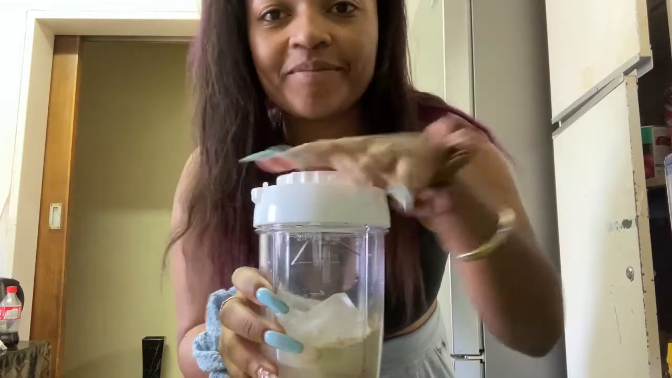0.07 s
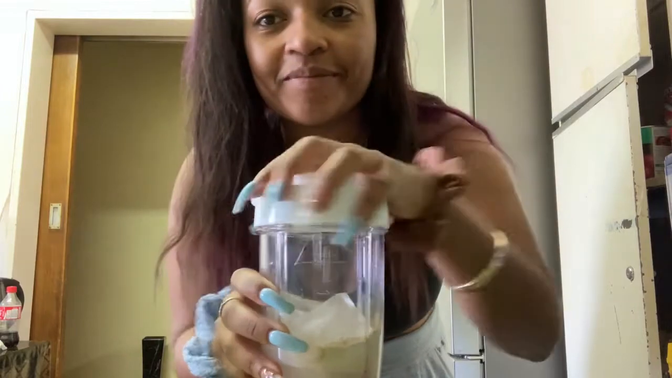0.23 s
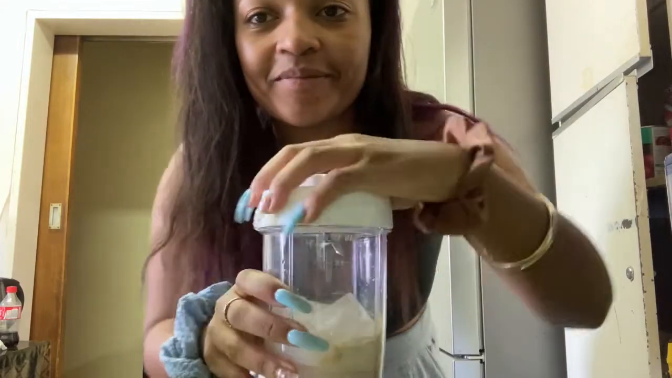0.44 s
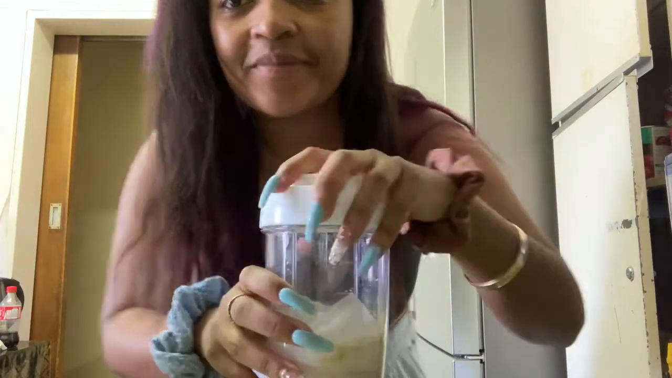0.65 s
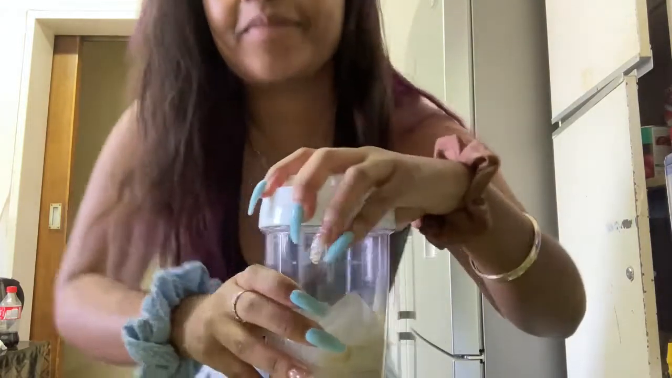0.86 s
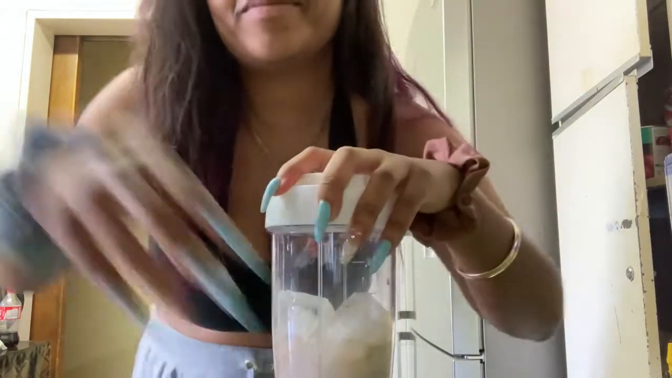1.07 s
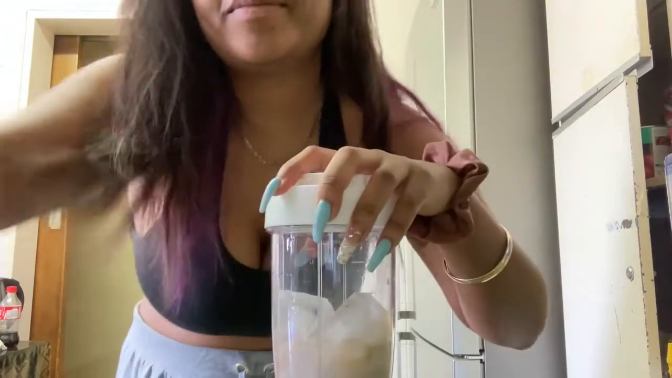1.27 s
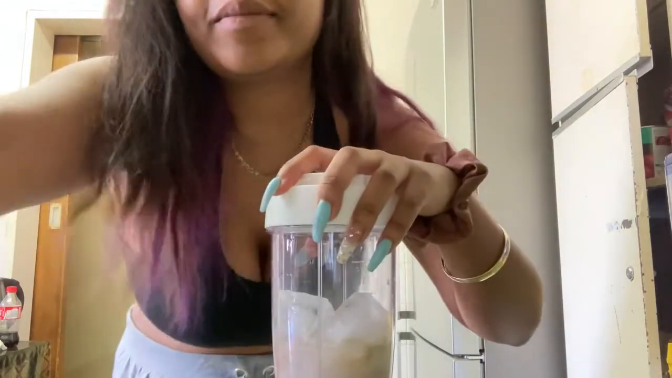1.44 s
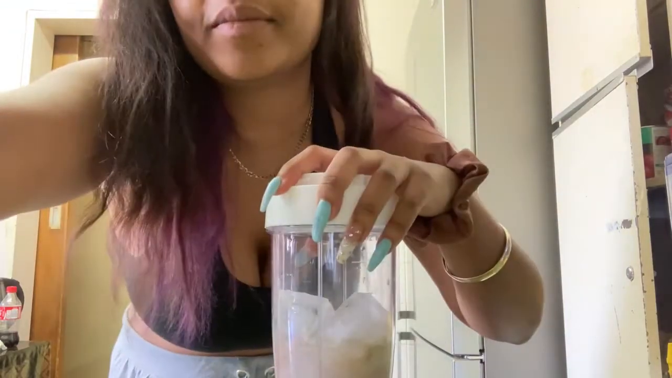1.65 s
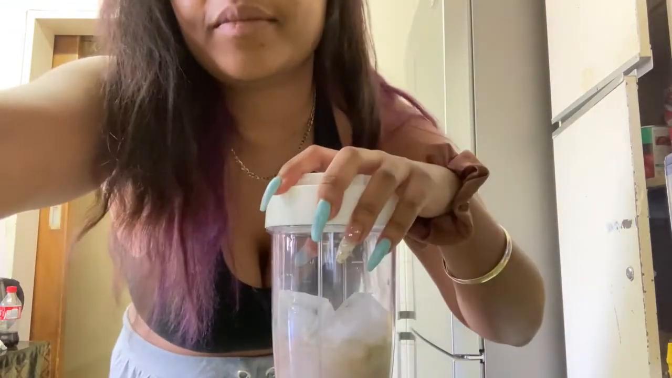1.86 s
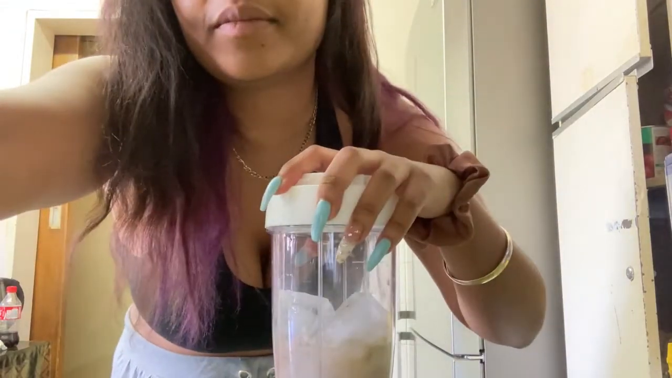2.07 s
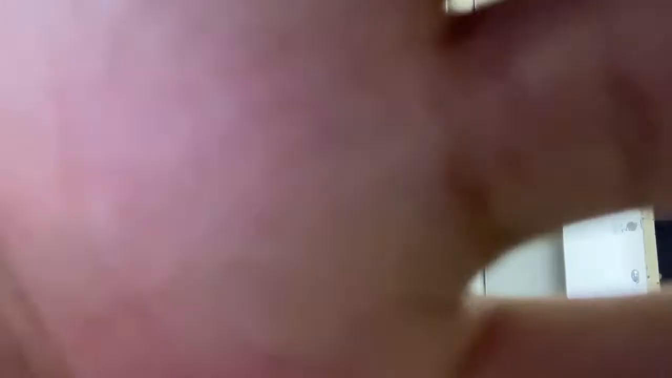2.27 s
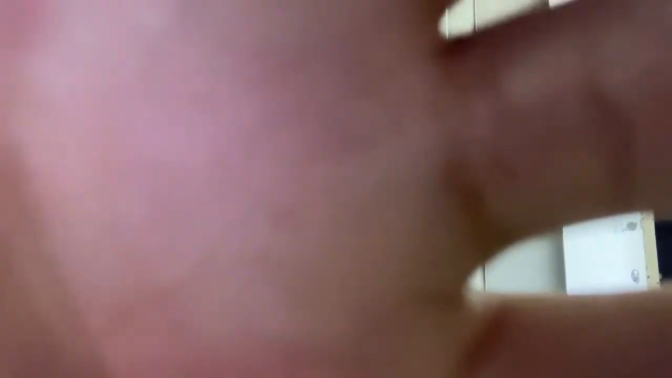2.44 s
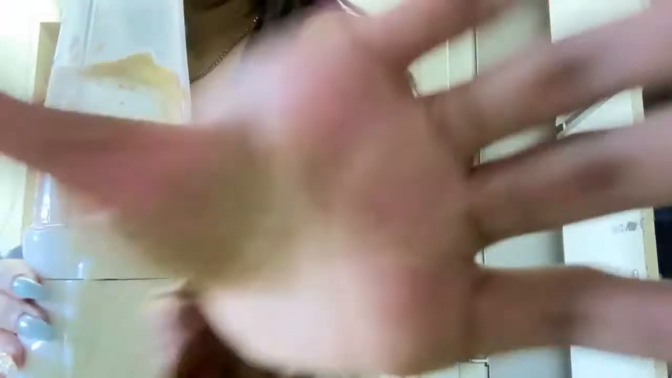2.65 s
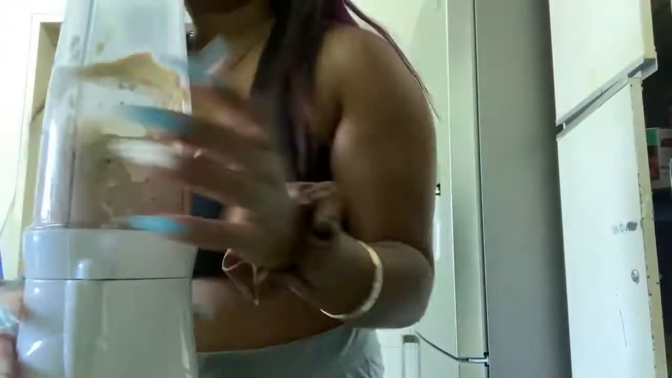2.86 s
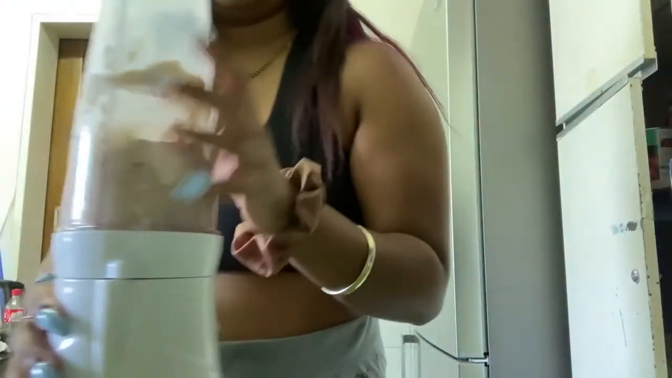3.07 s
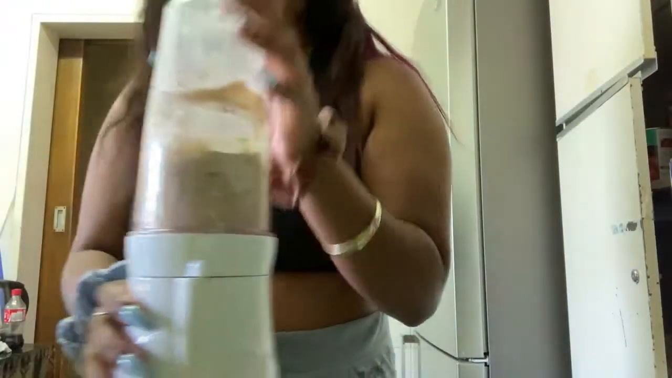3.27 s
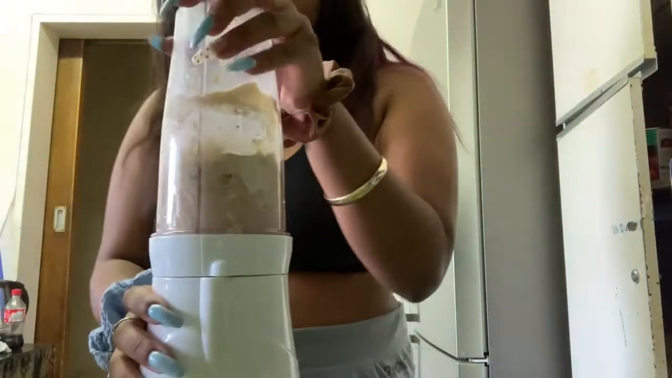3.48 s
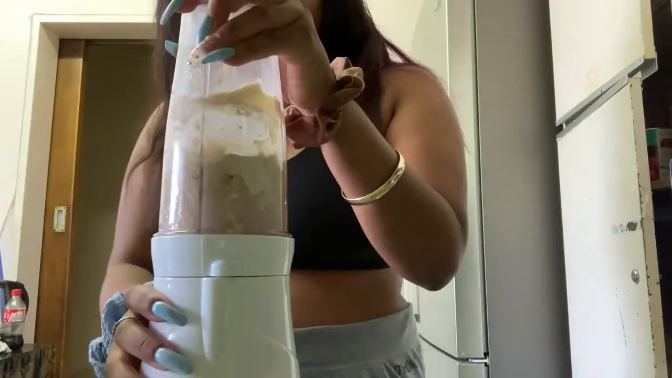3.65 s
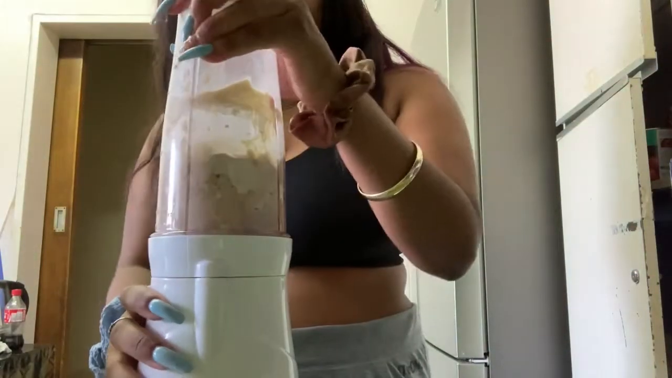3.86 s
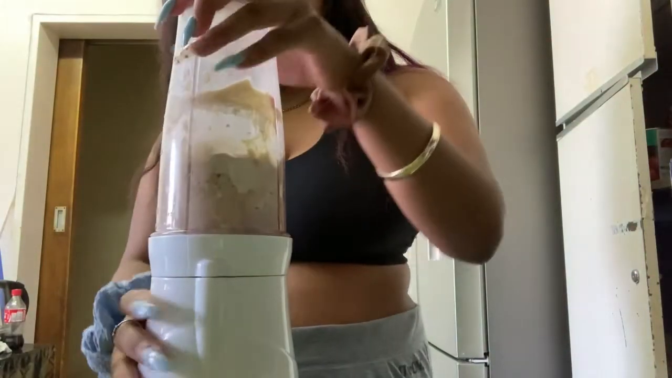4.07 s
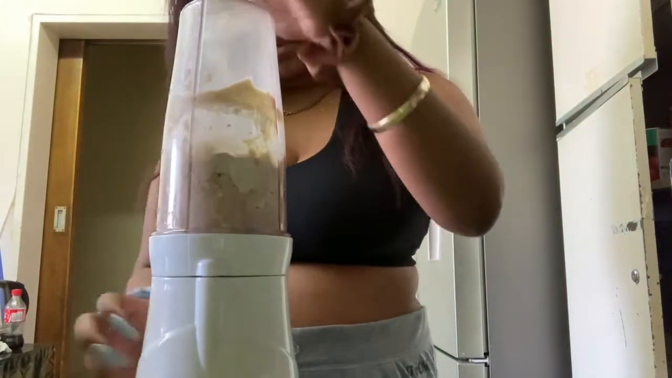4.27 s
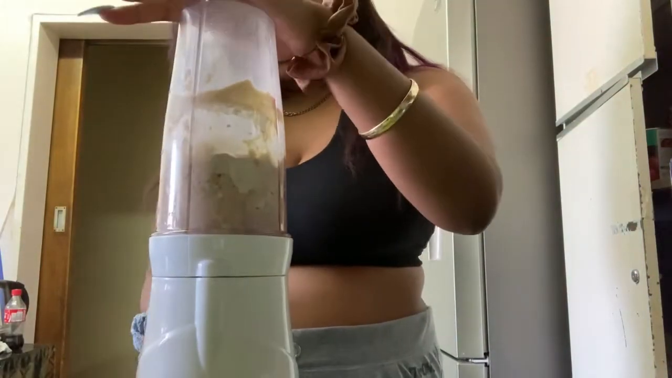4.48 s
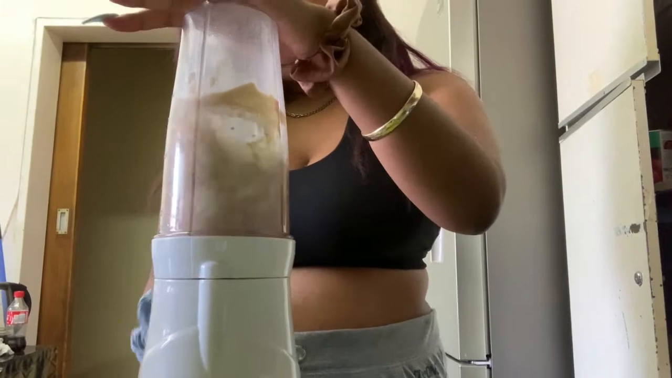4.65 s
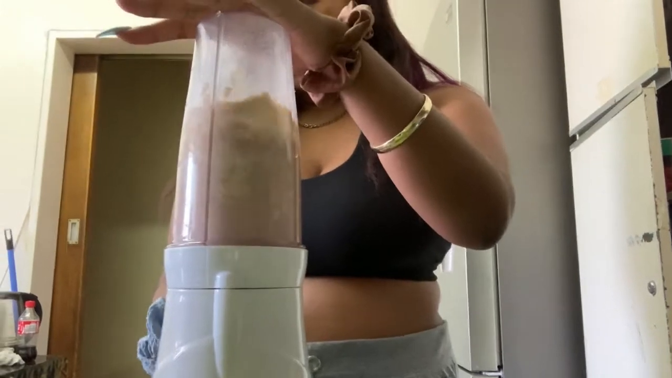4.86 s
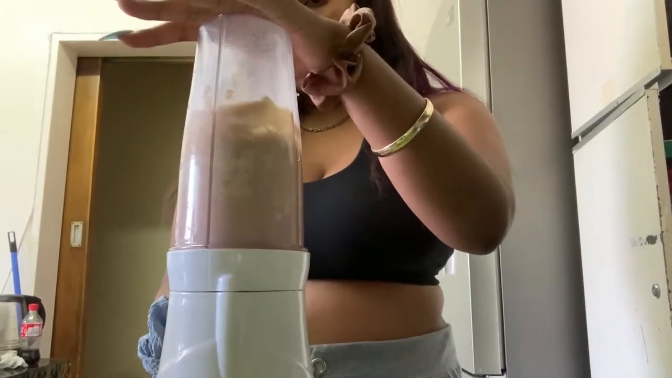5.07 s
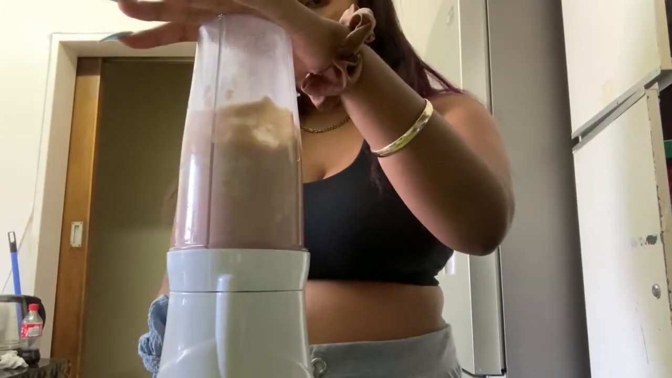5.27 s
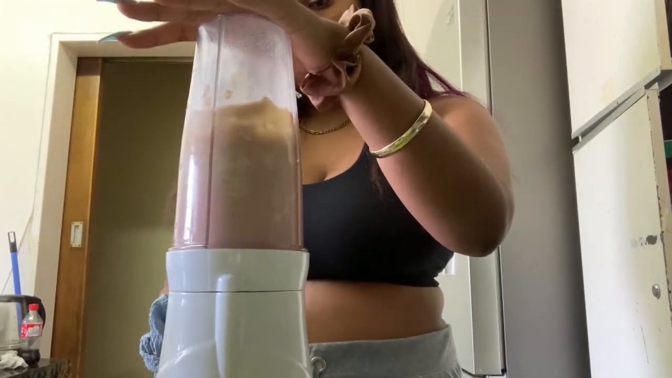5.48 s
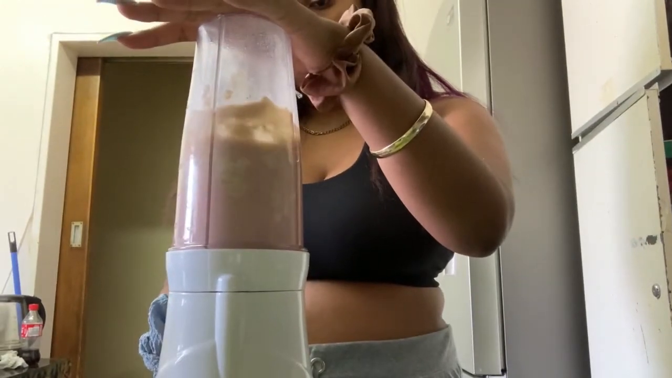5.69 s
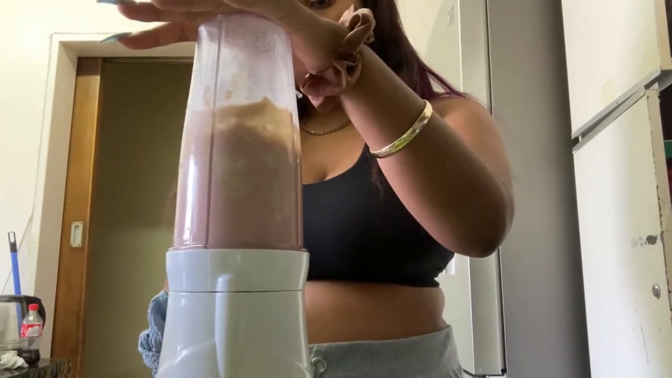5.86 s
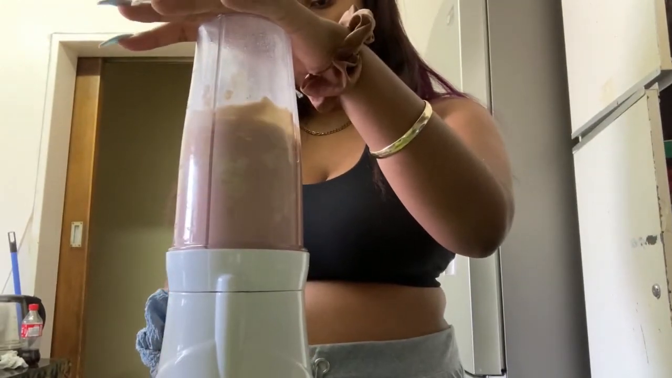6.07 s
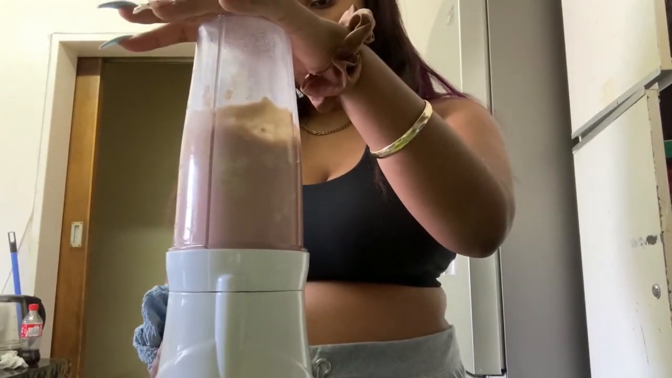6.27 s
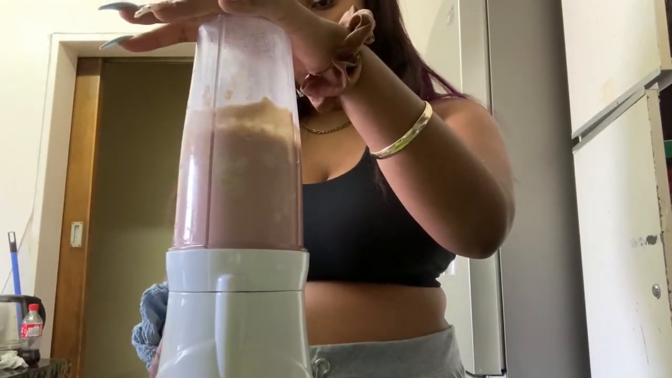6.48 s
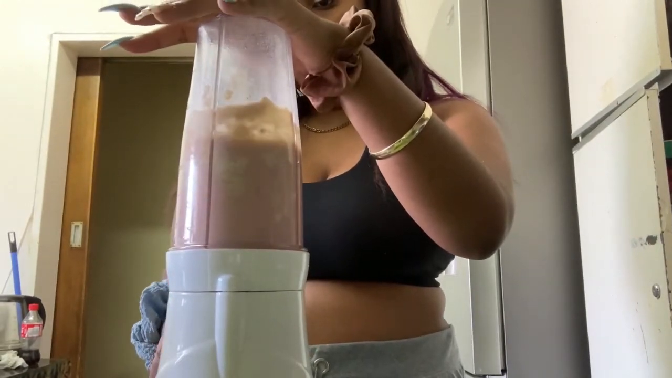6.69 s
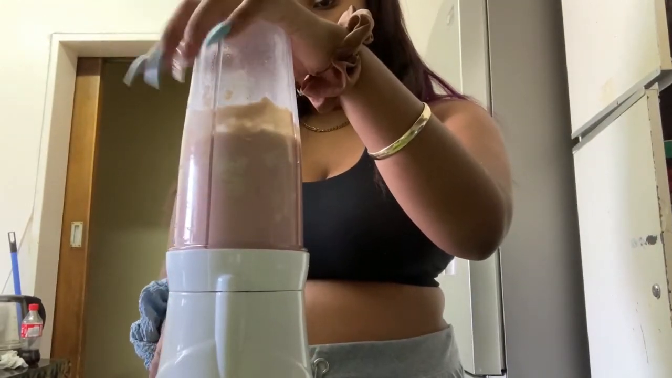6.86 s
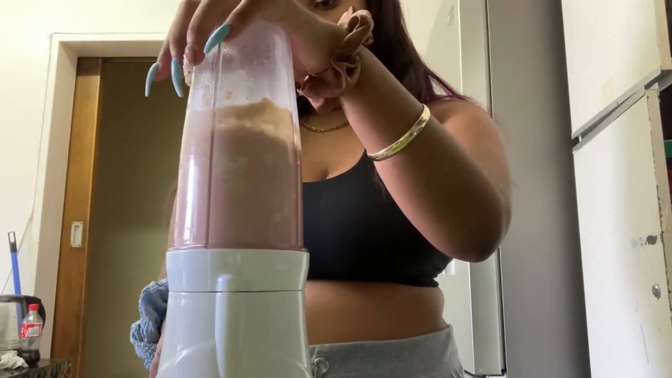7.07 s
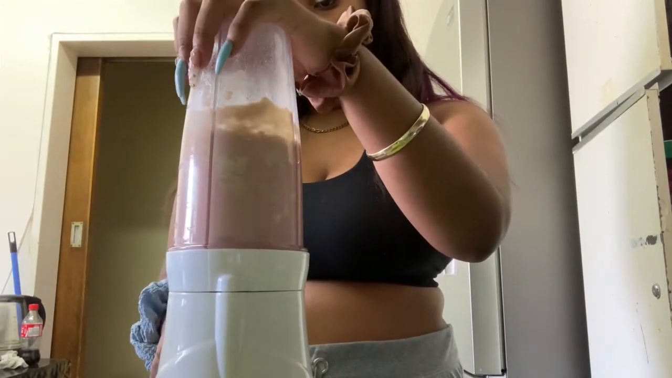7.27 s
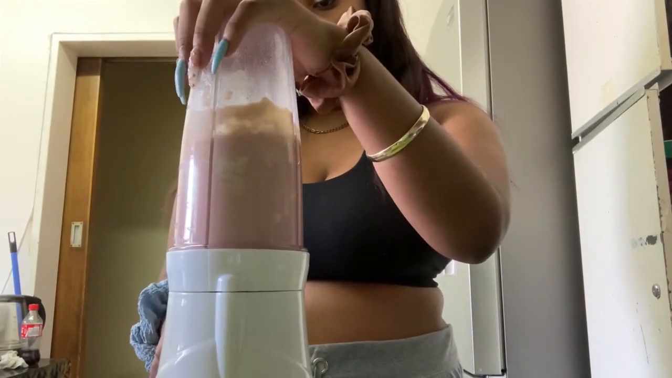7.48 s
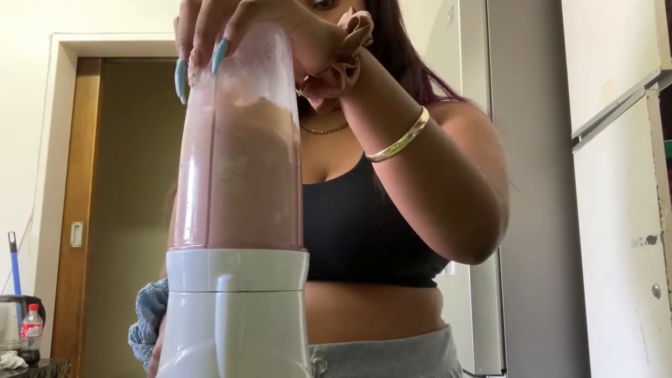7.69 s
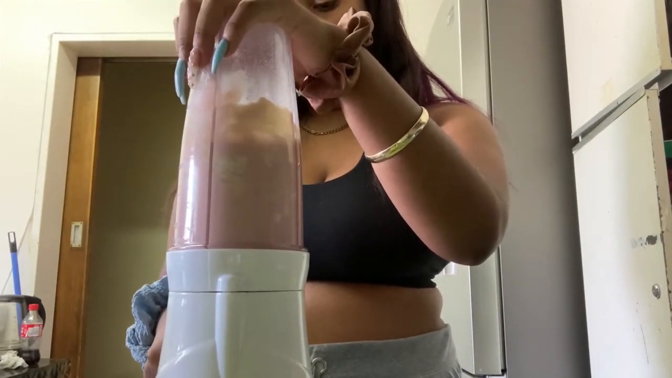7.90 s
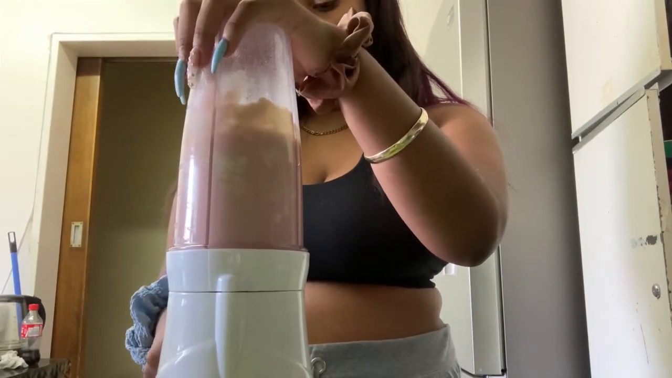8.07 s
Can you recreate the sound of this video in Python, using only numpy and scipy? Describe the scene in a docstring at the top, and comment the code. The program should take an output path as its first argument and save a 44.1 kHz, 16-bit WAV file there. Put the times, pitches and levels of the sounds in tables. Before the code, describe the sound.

Quiet handling first: rustling hands, plastic taps and low thumps on a counter, then near-stillness over fridge hum. A hollow sliding hiss and several firmer clicks follow, the strongest just before four seconds. Past the middle a switch clicks and a small blender starts at once, loud and rough, its ice cracking hardest at first, then rattling and churning over an unsteady motor drone. Recorded close, with slight kitchen reverberation.

```python
"""A kitchen counter, heard close by at two microphone ports, with room air and a fridge's hum throughout.
First hands rub and set down a personal blender: plastic clicks, counter thumps, a seal's squeak, soft bumps,
a very brief near-silence, a palm's hiss, a nail's tick and a juddering drag.
Then its switch clicks on: blades crack ice and grind chips against the plastic jar, air pockets ring in the
slush, liquid churns, and the load sags the motor, whose unbalanced shaft drones through the counter."""
import sys
import numpy as np
from scipy import signal
from scipy.fft import rfft, irfft, next_fast_len
from scipy.io import wavfile
from scipy.ndimage import uniform_filter1d

SR = 44100
rng = np.random.default_rng(int(sys.argv[2]) if len(sys.argv) > 2 else 0)


def wrap_up_sound(samples):
    """Save the sound to the file named by the first command line argument, as 16-bit audio."""
    columns = np.atleast_2d(samples).T
    # keep every value between -1 and 1, then stretch to whole-number steps
    tamed = np.clip(columns, -1, 1)
    steps = np.round(tamed * 32767).astype(np.int16)
    wavfile.write(sys.argv[1], SR, steps)


N = 358533
T = np.arange(N) / SR
START_S = 4.645  # the motor starts
# the shaft's speed at switch-on, the free speed it heads for, and its lag
KICK_HZ, FREE_HZ, INERTIA_S = 99.15, 219.1, 0.25
MILLING_DB = -25.5  # the blades keep milling loose chips between bites
AIR_DB = -52  # room air
# bites, when ice is drawn into the blades and brakes them: (start t/s, length/s, grinding level/dB, drag f/Hz)
BITES = [(4.646, 0.25, -20.5, 94), (5.123, 0.096, -26, 58.4), (5.302, .14, -21, 61.5),
         (5.675, 0.039, -20, 144), (5.926, 0.053, -21, 74), (6.096, 0.092, -20, 82.5),
         (6.249, 0.15, -36, 28), (6.681, 0.21, -22.5, 80.6), (6.997, 0.078, -23, 11.8),
         (7.134, 0.032, -21.5, 131), (7.356, 0.076, -49, 188), (7.496, 0.054, -20, 70),
         (7.694, 0.025, -49, 48.3), (7.803, 0.085, -21.5, 137), (7.982, 0.045, -19.5, 8.4)]


def ice(turns, chips_per_s=1700, spread_db=2.5, chips_db=-4.0, slush_db=-15, cracks_db=16.0,
        patchy_db=1.4, flicker_db=1.0, count=7):
    """Chips and cubes strike several spots on the jar, over the hiss of the slush; the switch clicks first."""
    # the switch's click (first row), then the loudest cubes hit by a blade:
    # (t/s, level/dB before cracks_db, treble as hardness/dB, decay of the click or crumbling/s)
    hits = [(4.6433, -13.5, -0.5, 0.0071), (4.657, -5, -11.5, 0.0086), (4.677, -11, -4.5, 0.0053),
            (4.699, -6.5, -13, 0.011), (4.738, -7.5, -11, 0.0047), (4.759, -6, -14, 0.003),
            (4.819, -9, -15.5, 0.004), (4.845, -11.5, -9, 0.01), (4.864, -17, -2.5, 0.019),
            (4.9, -21, 0, 0.012), (5.02, -15, -31, 0.013), (5.054, -16, -29, .006),
            (5.129, -14, -30, 0.0078), (5.21, -14, -15.5, 0.013), (5.262, -14, -17, .018),
            (5.314, -11, -14, 0.017), (5.331, -9.5, -12, 0.0049), (5.369, -21.5, 2, 0.0029),
            (5.402, -16, -5, 0.029), (5.53, -14, -29, 0.012), (5.695, -13, -13, 0.014),
            (5.931, -15.5, -16, 0.0084), (5.96, -14.5, -22, 0.0099), (5.996, -14.5, -26, .005),
            (6.0797, -20.5, -7, 0.0038), (6.15, -17.5, -3.5, 0.02), (6.254, -11.5, -30, .005),
            (6.316, -16, -25, .008), (6.342, -11.5, -18, 0.0096), (6.469, -12, -23, 0.0038),
            (6.696, -20, -26, .006), (6.73, -13.5, -28, .01), (6.775, -15.5, -13, 0.01),
            (6.817, -14, -14, 0.0042), (6.842, -14.5, -10.5, 0.0077), (7.06, -15.5, -22, 0.013),
            (7.147, -11.5, -31, 0.011), (7.158, -12, -27, 0.0036), (7.223, -15.5, -33, .012),
            (7.332, -13.5, -18, 0.0048), (7.364, -12.5, -29, 0.0068), (7.375, -12.5, -31, 0.0062),
            (7.447, -19.5, -22, .005), (7.524, -10, -17, .014), (7.541, -12, -13, 0.0054),
            (7.606, -17.5, -15, 0.0048), (7.633, -16, -11.5, 0.013), (7.699, -11, -18, 0.014),
            (7.795, -20.5, -26, 0.0039), (7.8182, -14.5, -7, .003), (7.841, -9.5, -30, 0.015),
            (7.922, -19, -9.5, 0.0032), (7.986, -11.5, -35, 0.0089), (8.112, -13, -29, 0.015)]
    milling_treble_db, bite_treble_db = -7, -11
    bite = biting()
    grinding = np.hypot(bite, gain_of(MILLING_DB))
    level = grinding * gain_of(patchy_db * wander(42)) * spin_up(0.03)
    treble_db = milling_treble_db + (bite_treble_db - milling_treble_db) * bite / grinding
    hard = gain_of(treble_db + flicker_db * wander(36))
    sizes = gain_of(spread_db * np.minimum(rng.exponential(1, N), 4.5)) * rng.choice([-1, 1], N)
    # chips fly in bunches, once in each turn of the blades
    bunching = 1 + 0.6 * np.cos(2 * np.pi * turns)
    chips = evened(sizes * (rng.random(N) < bunching * chips_per_s / SR))
    blows = level * (gain_of(chips_db) * chips + gain_of(slush_db) * rng.standard_normal(N))
    spot = rng.integers(0, count, N)
    out = np.zeros((2, N))
    all_hits = hits + pieces()
    on = int(START_S * SR) - 1024
    for k in range(count):
        # the swirl throws the ice now at one spot, now at another
        drive = blows * (spot == k) * evened(gain_of(1.3 * wander(15)))
        drive = drive + (hard - 1) * treble(drive)
        for at, *hit in all_hits[k::count]:
            add(drive, at, gain_of(cracks_db) * crack(*hit))
        out[:, on:] += convolve(space(drive[on:], room_db=-7.0), jar())
    return out * gain_of([[-0.6], [0.6]])


def crack(db, hard_db, decay_s, usual_treble_db=-13, heavy_db=-9, heft_db=3, heft_hz=800):
    """A cube breaks or the switch clicks: hard ones snap brightly, heavy ones also shove the wall of the jar."""
    spray = burst(decay_s, rise_s=0.00062)
    snap = (gain_of(hard_db - usual_treble_db) - 1) * treble(spray)
    low_pass = signal.butter(1, heft_hz, fs=SR, output="sos")
    shove = signal.sosfilt(low_pass, spray) * gain_of(heft_db + db - heavy_db)
    return gain_of(db) * (spray + snap + shove)


def pieces(per_s=16, level_db=-22, treble_db=-20, spread_db=1.5, decay_s=0.006):
    """Small pieces crack at random moments after switch-on: (t/s, level/dB, treble/dB, decay/s)."""
    times = T[(rng.random(N) < per_s / SR) & (T > START_S)]
    scatter = rng.standard_normal((len(times), 2))
    return [(s, level_db + spread_db * a, treble_db + spread_db * b, decay_s)
            for s, (a, b) in zip(times, scatter)]


def jar(shift=0.012):
    """Response of the jar towards each port; every spot struck rings a little higher or lower."""
    # modes of the filled jar: (f/Hz, width/Hz, lift at the left port/dB, lift at the right port/dB)
    jar_modes = [(500.7, 129, 7.5, 17.5), (731.4, 74, 13.5, 6), (1127, 85, 5, 7), (1488, 73, 1.5, 9),
                 (2244, 41, 5, 1.5), (2282, 43, 3, 6.5), (2485, 48, 2, 9.5), (2634, 67, 6, 1.5),
                 (2960, 34, 1, 2), (3654, 220, 8, 9), (3784, 104, 7, 5.5), (4747, 81, 7, 11),
                 (4325, 70, 10.5, 5)]
    # spectrum of ice striking the jar: (f/Hz, level/dB)
    ice_spectrum = [(40, -39), (150, -10), (280, -2.5), (600, -11.5), (850, 1.5), (1400, 0.5), (2500, 0.5),
                    (3300, -3), (4200, -10.5), (5400, -10), (9000, -8.5), (12000, -11.5), (15200, -11),
                    (16200, -44)]
    tuning = 1 + shift * rng.standard_normal(len(jar_modes))

    def towards(port):
        modes = [(hz * k, width, lift[port]) for (hz, width, *lift), k in zip(jar_modes, tuning)]
        return causal(lambda f: read(ice_spectrum, f) + lifts(modes, f))
    return np.array([towards(0), towards(1)])


def biting(attack_s=0.0089, release_s=0.0042):
    """Strength of the grinding in the bites: attack, hold, release."""
    total = np.zeros(N)
    for s, length, db, _ in BITES:
        attack = np.clip((T - s) / attack_s, 0, 1)
        release = np.exp(-np.maximum(T - s - length, 0) / release_s)
        total += gain_of(db) * attack * release
    return total


def pockets(width_hz=55, swing=0.06, patchy_db=4):
    """Air pockets in the whirling slush ring with the grinding; their pitch shifts as they open and close."""
    # air pockets: (f/Hz, level between bites/dB)
    pocket_rings = [(980, -43), (1300, -46.5), (2250, -44.5)]
    grinding = np.hypot(biting() / gain_of(MILLING_DB), 1) ** 0.5 * spin_up(0.02)
    rings = np.zeros(N)
    for hz, db in pocket_rings:
        pitch_hz = hz * (1 + swing * wander(7))
        ring = evened(resonate(rng.standard_normal(N), pitch_hz, width_hz))
        rings += gain_of(db + patchy_db * wander(12)) * ring
    return space(grinding * rings, room_db=-7)


def drone(turns, waver_db=1.5):
    """The unbalanced shaft drones at multiples of its turns, louder with speed and at the switch-on jolt."""
    level_db, db_per_octave, jolt_db, jolt_s = -23.5, 13.5, 31, 0.14
    order_levels_db = [2.5, -26.0, -17.0, -16, -21.5, -14.5]
    orders = sum(gain_of(db) * np.sin(2 * np.pi * (k + 1) * turns) for k, db in enumerate(order_levels_db))
    shake = 1 + 0.42 * wander(45)
    jolt = jolt_db * np.exp(-np.maximum(T - START_S, 0) / jolt_s)
    speed_db = db_per_octave * np.log2(shaft_speed() / FREE_HZ)
    hum = evened(orders) * shake * gain_of(level_db + speed_db + jolt + waver_db * wander(11.0))
    return space(spin_up(0.052) * hum, room_db=-26, scatter_db=-12) * gain_of([[0.3], [-0.3]])


def shaft_turns(unsteady=0.015):
    """Turns made by the shaft; the blows of the ice make its speed unsteady."""
    return np.cumsum(shaft_speed() * (1 + unsteady * wander(30))) / SR


def shaft_speed():
    """Each bite drags the shaft down; inertia smooths the sag and the recovery."""
    # the blades catch air and the motor races: (start t/s, length/s, push on the speed f/Hz)
    race = (6.47, .14, 30)
    drag_hz = sum(hz * ((T >= s) & (T < s + length)) for s, length, _, hz in BITES)
    race_s, race_length, race_hz = race
    drag_hz = drag_hz - race_hz * ((T >= race_s) & (T < race_s + race_length))
    pull = (FREE_HZ - KICK_HZ - drag_hz) * (T >= START_S)
    keep = np.exp(-1 / (SR * INERTIA_S))
    return KICK_HZ + signal.lfilter([1 - keep], [1, -keep], pull)


def churning(swirl_db=-30.5, lumpy_db=2.5):
    """The liquid rumbles through the counter, steadily and in gulps, stronger at the left port."""
    # spectrum of the churning liquid through the counter: (f/Hz, level/dB)
    churn_spectrum = [(20, -28), (45, -23), (80, -9.5), (100, 1), (113, -1), (150, 3.5), (200, -4),
                      (250, -20.5), (400, -16), (1000, -77)]
    # gulps, when the liquid slumps onto the blades: (middle t/s, length/s, level/dB)
    gulps = [(4.73, 0.6, -21), (5.42, 0.26, -22.5), (6.61, 0.17, -28), (7.42, 0.074, -25),
             (7.55, 0.058, -19.5), (7.71, 0.15, -24.5), (8.05, 0.19, -22.5)]
    churn = convolve(rng.standard_normal(N), causal(lambda f: read(churn_spectrum, f)))[0]
    churn = churn * np.hypot(gain_of(swirl_db + lumpy_db * wander(8.7)), swells(gulps))
    return space(spin_up(0.052) * churn, room_db=-16, scatter_db=-10) * gain_of([[2], [-2]])


def spin_up(rise_s):
    """Straight rise from silence at switch-on."""
    return np.clip((T - START_S) / rise_s, 0, 1)


def clicks(clicks_db=23, room_db=-4.0, usual_body_db=-5, usual_treble_db=-10, size=16384):
    """Plastic meets plastic: soft heavy contacts have more body, hard light ones more treble."""
    # clicks and knocks of lid, jar and base: (t/s, level/dB before clicks_db, body/dB, treble/dB,
    # ring of the struck spot f/Hz, its lift/dB, decay of the chatter/s)
    contacts = [(0.029, -29, 8, -33, 990, 9, 0.0029), (0.178, -37.5, 2, -11, 1100, 7, 0.0087),
                (0.194, -41, 8, -16, 238, 17, 0.0053), (0.2426, -27.5, -14, 0, 2750, 3.5, 0.0073),
                (0.246, -35, 13, -23, 300, 6, 0.0073), (0.633, -40, 2, -23, 1330, 7, 0.0078),
                (0.689, -38.5, -3, -15, 1310, 13, 0.0039), (1.6205, -37.5, -17, -19, 4240, 10, 0.003),
                (2.789, -44.5, -7, -11, 1700, 7, 0.012), (2.8177, -28, -19.5, -7, 1570, 14.5, 0.0075),
                (2.8894, -31.5, -12, -28, 1210, 11, 0.0083), (2.9044, -31.5, -6, -34, 1180, 9, 0.004),
                (3.486, -33.5, -7, -7.5, 1300, 6, 0.011), (3.5442, -34.5, -2.5, -5.5, 1500, 12.5, 0.006),
                (3.7358, -24.5, 4, -7, 280, 11, 0.005), (3.7431, -7, -9, -12.5, 1400, 12, .004),
                (3.751, -15, -4, -14, 745, 11, 0.0039), (3.771, -27, -7, -17, 3780, 14, 0.0057),
                (4.0652, -38, -11.5, -11, 1510, 9, 0.0085), (4.406, -27, -20, -12, 3760, 5, 0.0093),
                (4.413, -34, 15, -11, 734, 8.5, 0.0049), (4.468, -17, -19, -16, 1630, 13, 0.0036)]
    out = np.zeros((2, N))
    for s, db, body_db, treble_db, spot_hz, spot_db, decay_s in contacts:
        tilt = [(800, body_db - usual_body_db), (2600, 0.011), (4000, 0.012),
                (11000, treble_db - usual_treble_db)]
        response = housing(tilt, spot_hz, spot_db)
        contact = np.pad(burst(decay_s, rise_s=0.00031), (0, size))
        near = space(convolve(contact, response)[0], room_db=-17, scatter_db=1.0, scatter_t60=0.03)
        level = gain_of(db + clicks_db)
        add(out, s, level * near)
        # the room hears the whole housing, so the struck spot stands out less; its tail smooths the chatter
        far = convolve(room(room_db), housing(tilt, spot_hz, spot_db / 2))
        add(out, s + decay_s, level * far)
    return out


def housing(tilt, spot_hz, spot_db, spot_q=3.9):
    """Response of the plastic housing struck at one spot, with rms gain 1 in the midrange."""
    # spectrum of a click on the housing: (f/Hz, level/dB)
    plastic = [(40, -3), (200, 7.5), (500, 6.5), (800, 8), (1150, 3), (1800, 1), (3200, -0.5), (5000, -9),
               (9000, -8.5), (16000, -20)]
    # resonances of the housing: (f/Hz, width/Hz, lift/dB)
    housing_modes = [(460, 180, 8), (1096, 47, 6), (1450, 390, 3), (5080, 1100, 4)]
    modes = housing_modes + [(spot_hz, spot_hz / spot_q, spot_db)]
    response = causal(lambda f: read(plastic, f) + read(tilt, f) + lifts(modes, f))
    hz = np.fft.rfftfreq(len(response), 1 / SR)
    midrange = rfft(response)[(hz > 1000) & (hz < 5000)]
    return response / np.sqrt(np.mean(abs(midrange) ** 2))


def thumps(thumps_db=-4.0, rise_s=0.0058, size=22050):
    """Each push or set-down rings the modes of the counter."""
    # thumps into the counter: (t/s, level/dB before thumps_db)
    pushes = [(0.029, -12.5), (0.192, -19.5), (0.246, -13.5), (0.637, -17), (0.76, -28.5), (1.042, -29.5),
              (2.896, -29), (3.477, -16), (3.497, -21), (3.538, -20), (3.746, -6), (3.777, -11),
              (4.172, -26), (4.421, -15.5), (4.467, -22), (4.66, -6)]
    # modes of the counter: (f/Hz, level/dB, t60/s)
    counter = [(74.6, -18, 0.66), (103.7, -10, 0.44), (132.4, 10.5, 0.065), (149.2, -7.5, 0.39),
               (200.5, -2, 0.086), (243, 1, 0.032)]
    t = np.arange(size) / SR
    out = np.zeros(N)
    for s, db in pushes:
        ring = np.zeros(size)
        for hz, mode_db, t60 in counter:
            detuned_hz = hz * (1 + 0.051 * rng.standard_normal())
            ring += gain_of(mode_db - 60 * t / t60) * np.sin(2 * np.pi * detuned_hz * t)
        add(out, s, gain_of(db + thumps_db) * ring * (1 - np.exp(-t / rise_s)))
    left_bias = gain_of([[2.2], [-1.6]])
    return space(out, room_db=-26.0, scatter_db=-10) * left_bias


def squeak(at=0.249, length_s=0.039, from_hz=1880, to_hz=1660, level_db=-42, size=16384):
    """The lid slips on its seal with a short falling squeak."""
    hz = np.linspace(from_hz, to_hz, int(length_s * SR))
    # the seal grips unevenly
    hz = hz * (1 + 0.012 * evened(uniform_filter1d(rng.standard_normal(len(hz)), size=70)))
    turns = np.cumsum(hz) / SR
    tone = sum(gain_of(db) * np.sin(2 * np.pi * (k + 1) * turns) for k, db in enumerate([1, -7, -13, -12]))
    tone = gain_of(level_db) * tone * signal.windows.tukey(len(hz), 0.5)
    out = np.zeros((2, N))
    add(out, at, space(np.pad(tone, (0, size)), room_db=-4.0))
    return out


def bumps(from_hz=420, to_hz=240, sink_s=0.0103, swell_s=0.012, size=8192):
    """Soft dull bumps whose pitch sinks as they die."""
    # bumps: (t/s, level/dB)
    soft_bumps = [(2.237, -45.5), (2.34, -46), (2.412, -47.5)]
    t = np.arange(size) / SR
    turns = np.cumsum(to_hz + (from_hz - to_hz) * np.exp(-t / sink_s)) / SR
    bump = t / swell_s * np.exp(1 - t / swell_s) * np.sin(2 * np.pi * turns)
    out = np.zeros((2, N))
    for s, db in soft_bumps:
        add(out, s, gain_of(db) * space(bump, room_db=-12, scatter_db=-14))
    return out


def slide(uneven_db=1.6, size=8192):
    """A palm slides up the jar with a hollow hiss."""
    # course of the slide, before the final cut of 3 dB: (t/s, level/dB)
    palm = [(2.8, -64), (2.94, -55), (3.08, -56), (3.2, -50.5), (3.31, -53.5), (3.38, -61.5), (3.44, -89)]
    # hiss of skin on plastic: (f/Hz, level/dB)
    skin = [(200, -22), (450, -6), (900, -9), (1900, -6), (2600, 0.5), (4000, -7.5), (6000, -13),
            (9000, -14), (11500, -18), (14000, -20), (16200, -35)]
    # resonances that the palm stirs in the jar: (f/Hz, width/Hz, lift/dB)
    hollow = [(1260, 170, 14.5), (4600, 600, 4)]
    colour = causal(lambda f: read(skin, f) + lifts(hollow, f))
    s, db = np.transpose(palm)
    t = np.arange(s[0], s[-1], 1 / SR)
    level = gain_of(np.interp(t, s, db) + uneven_db * wander(45)[:len(t)])
    hiss = np.pad(level * rng.standard_normal(len(t)), (0, size))
    out = np.zeros((2, N))
    add(out, s[0], space(convolve(hiss, colour)[0], room_db=-0.5) * gain_of(-3))
    return out


def nail(at=3.095, level_db=-14, size=16384):
    """A fingernail ticks thinly against the jar."""
    # spectrum of the tick: (f/Hz, level/dB)
    nail_spectrum = [(500, -38), (2500, -19), (6000, -19), (8500, -12), (11000, -15), (13500, -5),
                     (15500, -11), (16500, -24)]
    contact = np.pad(burst(decay_s=0.0049, rise_s=0.0003), (0, size))
    tick = convolve(contact, causal(lambda f: read(nail_spectrum, f)))[0]
    out = np.zeros((2, N))
    add(out, at, gain_of(level_db) * space(tick, room_db=3.0))
    return out


def drag(level_db=-43, low_hz=48, high_hz=85):
    """The base judders on its feet as it is pulled across the counter; a fainter judder lies either side."""
    band = signal.butter(2, [low_hz, high_hz], "band", fs=SR, output="sos")
    judder = evened(signal.sosfilt(band, rng.standard_normal(N)))
    return judder * gain_of(level_db) * np.interp(T, [3.15, 3.3, 3.45, 3.62], [0.24, 0.8, 1.0, 0.028])


def rubbing(grip_db=-9):
    """Hands rub over lid and jar: high-passed hiss that slips unevenly, over a faint steady rustle."""
    # strokes: (middle t/s, length/s, level over the room air before the high-pass/dB)
    rubs = [(.05, 0.97, 7), (.46, 0.37, 6), (.7, 0.91, 2), (.91, 0.19, -1), (1.13, 0.31, -1)]
    slips = gain_of(2.5 * wander(19))
    handling = gain_of(grip_db) + swells(rubs) * slips
    high_pass = signal.butter(2, 900, "high", fs=SR, output="sos")
    hiss = signal.sosfilt(high_pass, convolve(rng.standard_normal((2, N)), air_colour()))
    return hiss * handling * gain_of(AIR_DB)


def fridge():
    """The fridge's compressor hums on a few harmonics with drifting phase."""
    # harmonics: (f/Hz, level/dB rms)
    harmonics = [(46.8, -54), (93.6, -60), (140.4, -54.5), (187.2, -60)]
    drift = 0.1 * wander(4.9)  # radians
    return sum(gain_of(db) * np.sqrt(2) * np.sin(2 * np.pi * hz * T + (k + 1) * drift)
               for k, (hz, db) in enumerate(harmonics))


def room_air():
    """Coloured noise of the quiet kitchen, partly shared by the two ports, wavering slowly."""
    waver = gain_of(0.9 * wander(4))
    noise = 0.54 * rng.standard_normal(N) + 0.83 * rng.standard_normal((2, N))
    return convolve(noise, air_colour()) * gain_of(AIR_DB) * waver


def air_colour():
    """Response that colours noise like the quiet kitchen."""
    # quiet kitchen: (f/Hz, relative level/dB per Hz)
    air = [(22, -36), (40, -20), (110, -8.5), (145, -4.5), (200, -12.5), (400, -21), (650, -26.5),
           (830, -29), (1200, -34), (1900, -41), (2300, -38), (3200, -42.5), (4000, -40.5), (5500, -39.5),
           (7000, -47), (9000, -38.5), (11500, -59), (15000, -46), (16200, -90)]
    return causal(lambda f: read(air, f))


def space(x, room_db, scatter_db=0, scatter_t60=0.031, size=512):
    """Direct sound at the two ports, near scatter and the kitchen's tail."""
    # lead of the left port over the right: (f/Hz, phase/rad)
    port_lead = [(80, 0), (200, -.7), (340, -.4), (500, -2.6), (740, -.6), (1250, 0), (1700, 1.2),
                 (2100, -.3), (3100, -1), (4100, -.2), (5800, -2.4), (7200, -2), (8300, -.2), (9400, .2),
                 (10800, 2.8), (11900, 3.4), (13300, 6.1), (14400, 6.6), (15800, 9)]
    # scatter off counter, hands and body, before scatter_db: (f/Hz, level/dB)
    scatter = [(100, -4), (220, -16), (400, 5), (850, -3), (1600, -5), (2500, -4), (5000, 2.5),
               (8000, -5.5), (15000, -45.5)]
    lead = read(port_lead, np.fft.rfftfreq(size, 1 / SR))
    direct = irfft(np.exp(0.5j * np.outer([1, -1], lead)))
    direct = np.roll(direct, size // 2, 1) * np.hanning(size)
    near = tail(lambda f: np.full_like(f, scatter_t60), lambda f: scatter_db + read(scatter, f), size=4096)
    far = room(room_db)
    add(far, 0, near)
    # the direct sound is centred in its window; the reflections start from there
    response = np.pad(far, ((0, 0), (size // 2, 0)))
    add(response, 0, direct)
    return convolve(np.pad(x, (0, size // 2)), response)[:, size // 2:]


def room(room_db, size=16384):
    """The kitchen's tail at the two ports."""
    # ring of the kitchen: (f/Hz, t60/s)
    kitchen_t60 = [(100, 0.5), (500, 0.3), (2500, 0.53), (5000, 0.55), (14000, 0.29)]
    tilt = [(150, 8.5), (500, 2.5), (4500, -5.5), (9000, -7.5)]  # (f/Hz, level/dB)
    return tail(lambda f: read(kitchen_t60, f), lambda f: room_db + read(tilt, f), size)


def tail(t60_at, db_at, size):
    """Diffuse reflections, unrelated at the two ports, each band dying at its own speed."""
    hz, t, z = signal.stft(rng.standard_normal((2, size)), SR, nperseg=256)
    z = z * gain_of(-60 * t / t60_at(hz)[:, None])
    energy = np.linalg.norm(signal.istft(z, SR)[1][0])
    return signal.istft(z * gain_of(db_at(hz))[:, None], SR)[1] / energy


def burst(decay_s, rise_s, size=2048):
    """A contact chatters: a spray of tiny clicks that builds quickly and dies, with no pitch of its own."""
    t = np.arange(size) / SR
    ticks = rng.choice([-1, 1], size) * (rng.random(size) < 0.4)
    spray = ticks * np.exp(-t / decay_s) * (1 - np.exp(-t / rise_s))
    # divide out the spray's own smoothed spectrum
    power = uniform_filter1d(abs(rfft(spray)) ** 2, size=9)
    hz = np.fft.rfftfreq(size, 1 / SR)
    flatten = causal(lambda f: -10 * np.log10(np.interp(f, hz, power)), size=size)
    spray = convolve(spray, flatten)[0]
    return spray / np.linalg.norm(spray)


def treble(x):
    """The part of x that hard contacts add."""
    return signal.sosfilt(signal.butter(1, 5500, "high", fs=SR, output="sos"), x)


def resonate(x, hz, width_hz):
    """A resonance of gain 1 that follows the curve hz."""
    turn = np.exp(2j * np.pi * np.cumsum(hz) / SR)
    r = np.exp(-np.pi * width_hz / SR)
    # shift the resonance to 0 Hz, smooth there, shift back
    return 2 * (turn * signal.lfilter([1 - r], [1, -r], x / turn)).real


def lifts(modes, f):
    """Decibels added at frequencies f by resonances given as (f/Hz, width/Hz, lift/dB)."""
    return sum(lift / (1 + (2 * (f - hz) / width) ** 2) for hz, width, lift in modes)


def causal(db_at, size=4096):
    """Minimum-phase response of energy 1 for a gain given in dB against Hz."""
    log_gain = np.log(gain_of(db_at(abs(np.fft.fftfreq(size, 1 / SR)))))
    response = np.fft.ifft(np.exp(np.conj(signal.hilbert(log_gain)))).real
    return response / np.linalg.norm(response)


def swells(rows):
    """Smooth rises and falls, one for each (middle t/s, length/s, level/dB)."""
    return sum(gain_of(db) * np.cos(np.pi * np.clip((T - s) / length, -0.5, 0.5)) ** 2
               for s, length, db in rows)


def wander(rate_hz):
    """Slow random curve of rms 1, with nothing faster than rate_hz."""
    size = next_fast_len(N)
    slow = rfft(rng.standard_normal(size)) * (np.fft.rfftfreq(size, 1 / SR) < rate_hz)
    return evened(irfft(slow, size)[:N])


def gain_of(db):
    """Decibels to gain."""
    return 10 ** (np.asarray(db) / 20)


def evened(x):
    """Scales to rms 1."""
    return x / np.sqrt(np.mean(x ** 2) + 1e-20)


def read(points, hz):
    """Reads a curve on a log-frequency axis."""
    f, value = np.transpose(points)
    return np.interp(np.log(hz + 1), np.log(f + 1), value)


def add(mix, s, sound):
    """Adds a sound into the mix at time s."""
    part = mix[..., max(round(s * SR), 0):][..., :sound.shape[-1]]
    part += sound[..., :part.shape[-1]]


def convolve(x, response):
    """Convolves along time, keeping the length of x."""
    return signal.fftconvolve(np.atleast_2d(x), np.atleast_2d(response), axes=1)[:, :x.shape[-1]]


def scene():
    """Handling, then blending, in the kitchen."""
    turns = shaft_turns()
    blending = ice(turns) + pockets() + drone(turns) + churning()
    handling = clicks() + thumps() + squeak() + bumps() + slide() + nail() + drag() + rubbing()
    return blending + handling + fridge() + room_air()


def record(dry, edge_hz=16300):
    """The sound drops nearly to silence for an instant; peaks are rounded off; then the band limit."""
    dropout = np.interp(T, [2.28, 2.29, 2.317, 2.327], [1, 0.01, 0.01, 1])
    rounded = dry * dropout / (1 + dry ** 6) ** (1 / 6)
    low_pass = signal.firwin(511, edge_hz, window=("kaiser", 9), fs=SR)
    return signal.oaconvolve(rounded, low_pass[None], "same")


dry = scene()
out = record(dry)
wrap_up_sound(out)
```